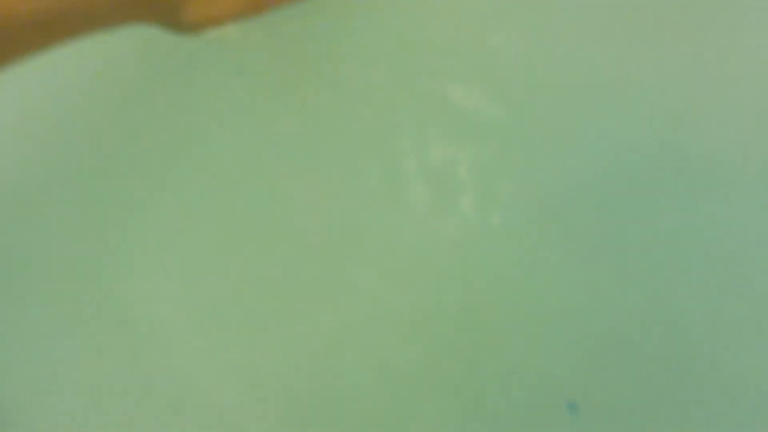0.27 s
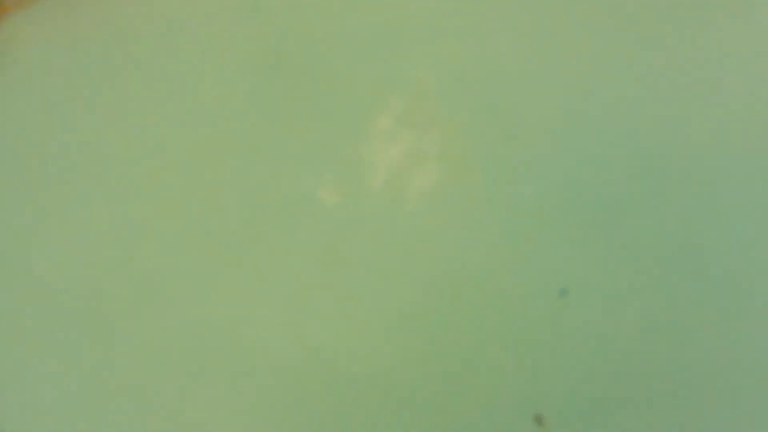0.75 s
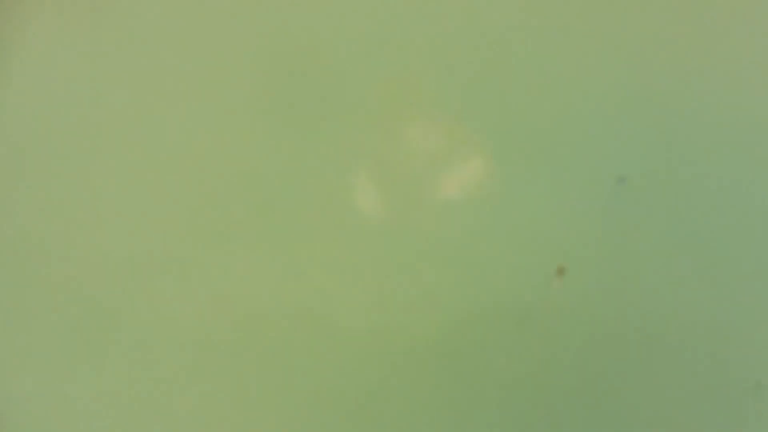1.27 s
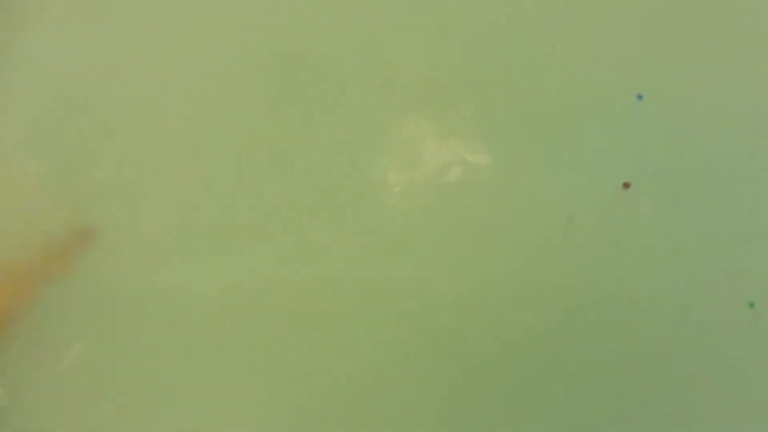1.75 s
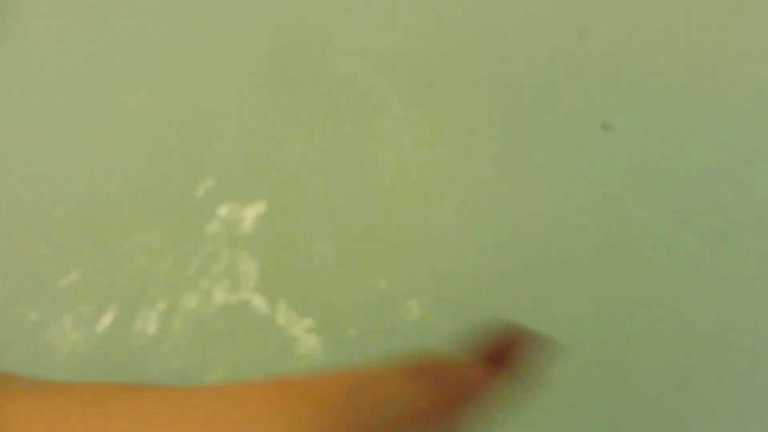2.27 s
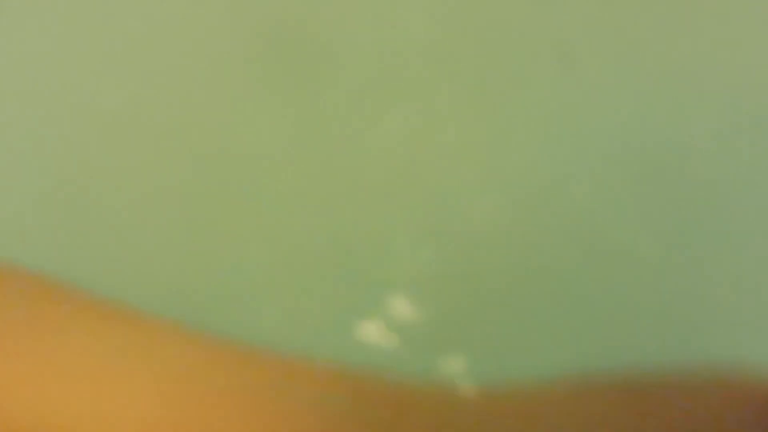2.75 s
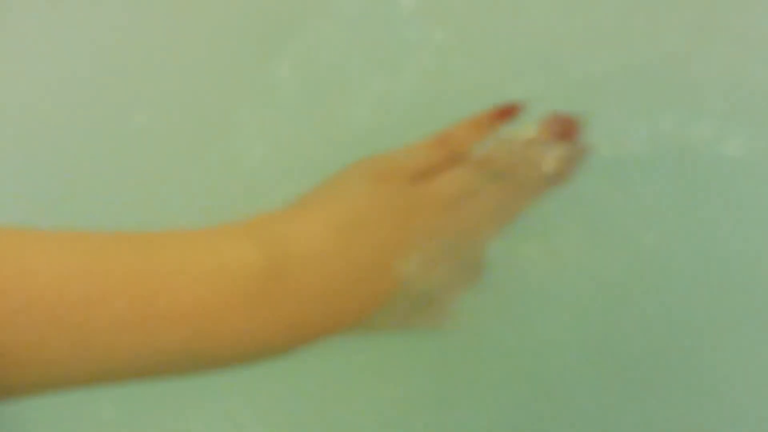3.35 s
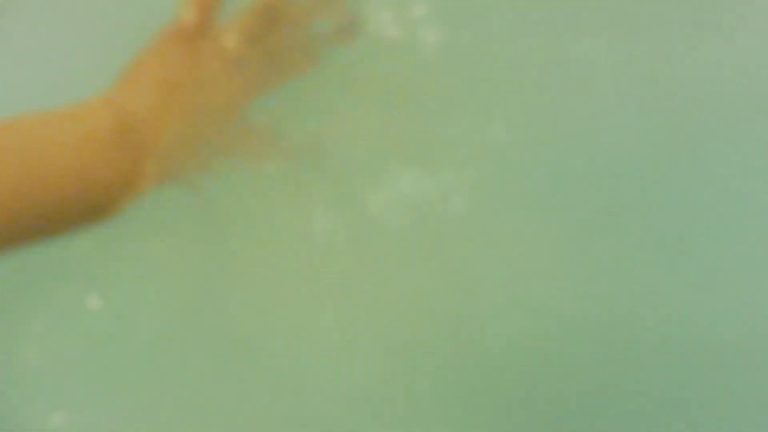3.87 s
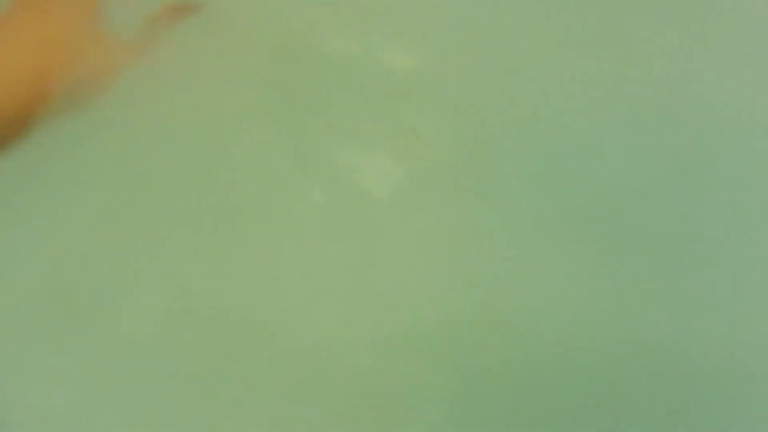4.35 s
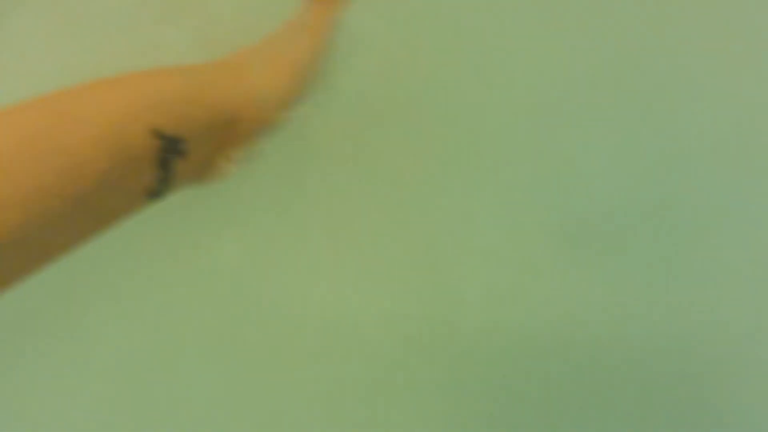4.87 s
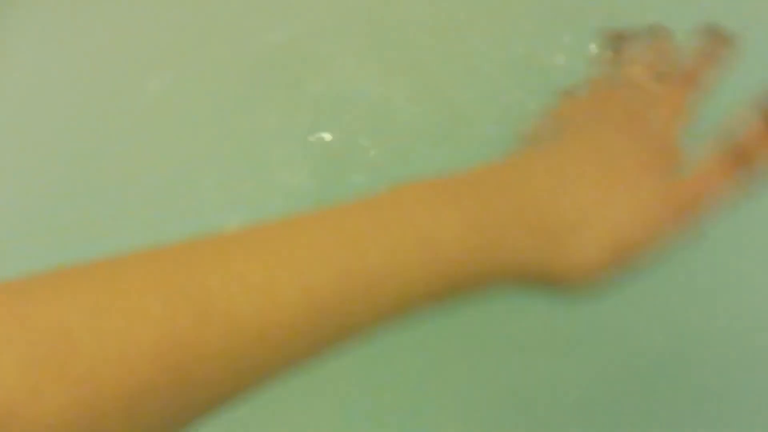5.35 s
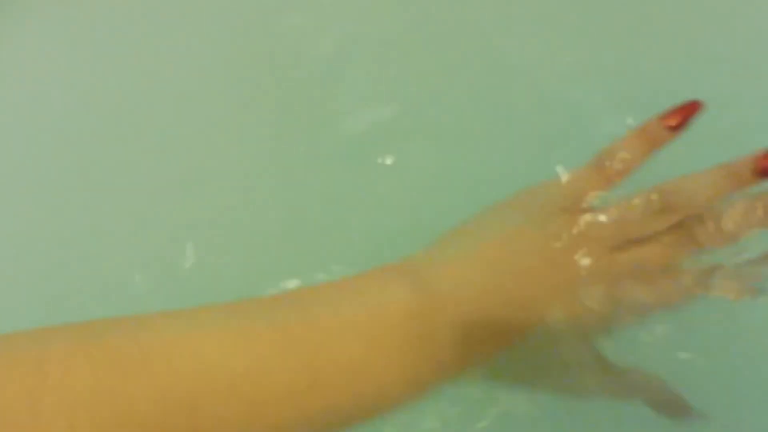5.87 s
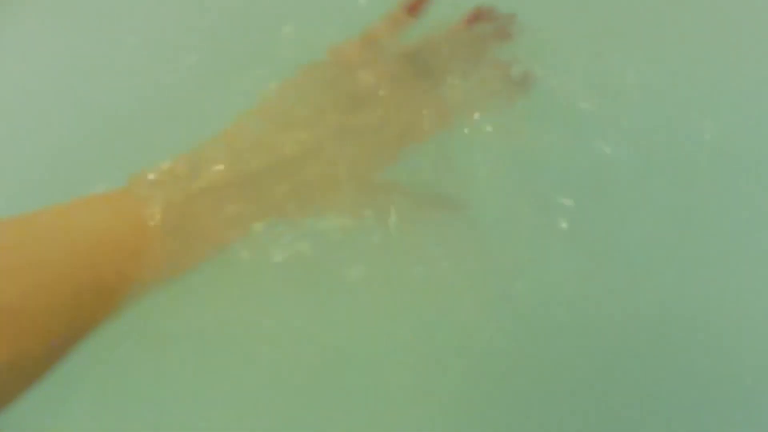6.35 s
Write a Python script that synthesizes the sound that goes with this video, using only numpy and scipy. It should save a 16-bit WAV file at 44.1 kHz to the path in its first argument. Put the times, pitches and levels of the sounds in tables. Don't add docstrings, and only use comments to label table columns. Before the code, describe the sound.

Constant airy hiss with a soft mid-pitched duct whistle fills a little tiled room. Close to a single microphone, bath water ticks with a short drip cluster, then churns in a half-second burst of gurgling bubbles and sharp droplets. Light drips follow near the middle, another small plop comes later, and a couple of faint drops end it. Tub and tiles add a short reverberation.

```python
import sys
import numpy as np
from scipy import signal
from scipy.fft import rfft, irfft, next_fast_len
from scipy.io import wavfile
from scipy.ndimage import uniform_filter1d, map_coordinates

SR = 44100
rng = np.random.default_rng(int(sys.argv[2]) if len(sys.argv) > 2 else 0)


def voltage_ratio(level):
    return 10 ** (np.asarray(level, float) / 20)


def log_audio(samples):
    frames = np.atleast_2d(samples).T
    limited = np.clip(frames, -1, 1)
    pcm = np.round(limited * 32767).astype(np.int16)
    wavfile.write(sys.argv[1], SR, pcm)


N = 291661


def rms_one(x):
    return x / np.sqrt(np.mean(x ** 2) + 1e-20)


def drift(rate_hz):
    pole = np.exp(-80 * np.pi * rate_hz / SR)
    noise = rng.standard_normal(N // 40 + 2002)
    slow = signal.lfilter([1], [1, -2 * pole, pole * pole], noise)[2000:]
    return np.interp(np.arange(N) / 40, np.arange(len(slow)), rms_one(slow))


def add_bubble(out, start_s, hz, db, t60, rise_octaves):
    start, t60 = int(start_s * SR), max(t60, 0.0004)
    length = min(int(t60 * SR) + 8, N - start)
    age = np.arange(length) / SR / t60
    pitch_hz = np.minimum(hz * 2 ** (rise_octaves * age), 0.45 * SR)
    cycles = np.cumsum(pitch_hz) / SR
    onset_cycles = max(1.2, 0.039 * t60 * hz)
    onset = 1 - np.exp(-cycles / onset_cycles)
    out[start:start + length] += voltage_ratio(db - 60 * age) * onset * np.sin(2 * np.pi * cycles)


# [t/s, f/Hz, level/dB]
HELD_BUBBLES = [(0.7799, 1900, -51.5), (1.4531, 1600, -38.5), (1.5297, 3330, -46.5), (1.5299, 3830, -49),
                (1.5343, 1527, -41.5), (1.54, 3770, -49), (1.5442, 3580, -44), (1.5956, 1838, -25),
                (1.6363, 2450, -41), (1.6635, 2320, -41), (1.6835, 2110, -40), (1.7176, 1800, -46),
                (1.7528, 2200, -50), (1.7611, 3130, -42), (1.7773, 2220, -43), (1.79, 557.6, -38),
                (1.853, 1320, -41), (1.8587, 2610, -39), (1.8776, 736, -36.5), (1.89, 1113, -37),
                (1.9, 1300, -37), (1.9059, 3500, -34), (1.913, 1880, -48), (1.9256, 599, -42),
                (2.8762, 2330, -49.5), (2.922, 3060, -55), (2.9521, 1954, -44), (6.2146, 1800, -48),
                (3.0133, 3230, -51), (4.85, 1400, -45), (4.866, 1466, -51)]
# [t/s, f/Hz, level/dB]
PLOPS = [(1.4625, 1620, -45), (1.5392, 3300, -44), (1.551, 1900, -54), (1.5956, 2560, -35.5),
         (1.603, 3000, -34), (1.615, 2060, -41), (1.622, 3120, -41), (1.7114, 493, -50),
         (1.7156, 2480, -35), (1.7656, 550, -35.5), (1.768, 3085, -34.5), (1.7783, 1410, -32),
         (1.7804, 738, -37), (1.7882, 2920, -42), (1.8202, 3310, -31.5), (1.8339, 2360, -34),
         (1.8497, 2220, -28.5), (1.865, 1580, -39), (1.8933, 2500, -41), (1.9094, 4360, -29.5),
         (1.9125, 1207, -35), (1.9253, 1780, -36), (1.9309, 3800, -39), (2.0241, 1890, -42),
         (2.0682, 3100, -49), (2.1416, 7300, -36.5), (2.799, 3760, -43.5), (2.8242, 2830, -48),
         (2.829, 4160, -39), (2.8425, 4700, -41)]
# [t/s, f/Hz, level/dB]
DRIPS = [(0.072, 7600, -42), (0.367, 4650, -44), (0.3676, 2690, -43), (0.3765, 950, -40.5),
         (0.391, 1950, -42), (0.7663, 2220, -50), (0.9885, 4540, -46.5), (1.1459, 6660, -45),
         (2.9095, 4450, -46), (2.975, 1500, -46), (2.97, 2630, -46), (2.9847, 1600, -47),
         (3.048, 2600, -52), (3.0805, 2530, -41), (3.081, 3520, -42), (3.126, 4430, -41.5),
         (3.153, 6300, -50), (3.199, 6500, -50), (4.861, 3330, -41), (4.8095, 4340, -45.5),
         (4.872, 1510, -48), (4.878, 1850, -44.5), (4.905, 1390, -50), (4.963, 2800, -54),
         (0.353, 2880, -44), (0.38, 2530, -46), (0.396, 2600, -50), (0.457, 3470, -53), (5.975, 3200, -58),
         (6.133, 1000, -48.5), (4.9161, 2240, -44.5), (4.9348, 2830, -38), (4.948, 967, -38.5),
         (5.211, 2680, -46.5), (5.3305, 3510, -44), (5.6173, 2370, -46.5), (6.034, 2690, -45.5),
         (6.1442, 1450, -43.5), (6.2236, 1660, -44.5)]


def rising_bubbles(out):
    for rows, cycles, climb in (HELD_BUBBLES, 82, 0.16), (PLOPS, 52, 0.18), (DRIPS, 55, 0.22):
        chances = rng.uniform(0.18, 1.68, len(rows))
        for (s, hz, db), chance in zip(rows, chances):
            add_bubble(out, s, hz, db, cycles / hz, climb * chance)


# [t/s, f/Hz, level/dB, cycles to die]
TICKS = [(0.35, 3070, -26.5, 15), (1.466, 997, -47, 70.), (2.9695, 1480, -33, 16.),
         (3.1503, 6400, -33, 20.), (3.197, 6600, -35, 20.), (1.607, 9300, -48, 90.), (1.782, 590, -36, 45.),
         (1.58, 780, -44, 45.), (1.8495, 2250, -33, 40.), (5.2, 2050, -52, 40.), (5.635, 2450, -50, 50.),
         (5.612, 4450, -53, 70.), (1.49, 1080, -52, 60.), (1.487, 1550, -48, 50.), (1.63, 1850, -38, 70.),
         (1.71, 478, -46, 52), (1.775, 555, -40, 40.), (1.806, 1450, -42, 30.), (6.146, 1300, -42.5, 23),
         (6.156, 1136, -48.5, 35.), (4.6, 2070, -56, 40.), (4.58, 1300, -52.5, 34),
         (0.3662, 3630, -36, 28.), (0.4073, 2310, -39.5, 25), (0.427, 322, -40, 13),
         (0.7184, 2970, -46.5, 30.), (1.616, 3470, -38, 28.), (1.731, 2353, -36, 23),
         (1.7921, 1740, -23, 13), (1.907, 2780, -28, 27), (1.9114, 2004, -15, 22),
         (1.9126, 1700, -18, 18.4), (1.9148, 3170, -19, 6.5), (2.004, 1970, -36, 23),
         (2.1448, 2070, -42.5, 21), (5.601, 4500, -46, 43), (2.777, 1580, -45, 25), (2.913, 3120, -32, 24),
         (2.914, 1750, -35, 28), (2.9143, 6640, -20, 9.5), (2.9637, 4500, -41, 29.),
         (3.0803, 3150, -26, 14), (3.1013, 2940, -36, 26), (3.12, 1780, -31.5, 13),
         (4.852, 1750, -40.5, 50), (4.93, 4300, -36.5, 31.), (5.1894, 2420, -41.5, 24),
         (6.153, 3010, -48, 46), (5.9606, 3320, -25.5, 10.6), (6.001, 5640, -40, 17),
         (6.1405, 2290, -35.5, 7.5)]
# [t/s, f/Hz, level/dB, cycles to die]
BURBLES = [(0.363, 3060, -45.0, 80), (0.3673, 2550, -50.0, 80), (1.4666, 3060, -53.0, 80),
           (1.5537, 2240, -52.0, 52), (1.5566, 1560, -49.0, 29), (1.5581, 2970, -54.0, 80),
           (1.5588, 3440, -49, 80), (1.5769, 2630, -58, 73), (1.6052, 3470, -44, 88),
           (1.6154, 2050, -41, 57), (1.6168, 560, -50, 90), (1.6183, 2630, -49, 80),
           (1.6284, 3620, -52.0, 80), (1.6444, 3190, -47, 80), (1.6611, 468, -48, 55),
           (1.6865, 1700, -45, 53), (1.7112, 2220, -44, 55), (1.7453, 1025, -36.5, 72),
           (1.7533, 2220, -43, 74), (1.7664, 1540, -51, 42), (1.799, 2900, -46, 80),
           (1.8017, 2430, -40, 57), (1.8077, 2760, -52.0, 80), (1.8186, 1760, -39, 49),
           (1.8345, 3920, -52.0, 80), (1.851, 1580, -37, 37), (1.8585, 608, -47, 43),
           (1.8599, 2650, -47, 80), (1.8708, 3230, -53.0, 80), (1.8773, 777, -39, 74),
           (1.8868, 1630, -47, 80), (1.8947, 2440, -50, 68), (1.9419, 2580, -49, 80),
           (1.9434, 1780, -42, 80), (1.9455, 3900, -52.0, 80), (1.947, 1370, -48, 44),
           (1.9521, 637, -42.5, 25), (1.9992, 2670, -55.0, 80), (2.0225, 2610, -52.0, 80),
           (2.8127, 3920, -56.0, 80), (2.8305, 991, -42.5, 76), (2.9137, 1290, -49.0, 52),
           (3.123, 3180, -55.0, 80), (3.1747, 2100, -54, 80), (4.9283, 1590, -50, 72),
           (4.9873, 1115, -45, 60)]
# [t/s, f/Hz, level/dB]
STRAYS = [(0.326, 6750, -46), (0.4285, 3470, -45), (0.445, 2020, -49), (1.4667, 3670, -49),
          (1.6437, 2470, -38), (1.8007, 2420, -45), (1.803, 550, -36), (2.547, 2600, -48),
          (2.829, 2280, -50), (2.8577, 3250, -45), (2.9521, 3640, -42), (3.1295, 2500, -51),
          (3.256, 2760, -50), (3.744, 4400, -46.5), (3.9, 2040, -52), (4.6101, 3060, -51),
          (4.785, 3420, -46.5), (4.8514, 2590, -48), (4.9354, 6000, -42), (5.5561, 3870, -49.5)]
# [t/s, f/Hz, level/dB]
SPARKLES = [(0.3248, 10600, -54.0), (0.3734, 5860, -50.0), (0.3923, 11890, -53), (1.1447, 11100, -61),
            (1.5692, 4220, -46), (1.5946, 9300, -48), (1.62, 5130, -43.0), (1.6208, 5940, -43),
            (1.7383, 10600, -46), (1.7398, 9700, -51), (1.7456, 11280, -53), (1.7499, 9900, -51),
            (1.7521, 5560, -52.0), (1.7673, 9440, -44), (1.7673, 10200, -44), (1.7876, 5300, -52),
            (1.7898, 9730, -53.0), (1.7971, 8700, -48), (1.7971, 10080, -49.0), (1.8341, 8650, -50),
            (1.8435, 5650, -47), (1.8435, 6290, -49.0), (1.895, 4740, -51), (1.9066, 6160, -41.5),
            (1.9096, 10850, -54), (1.9103, 9220, -43), (1.9175, 4530, -48), (1.9175, 9220, -53),
            (2.8267, 11300, -48), (2.8267, 11710, -53.0), (2.8275, 5080, -45.0), (2.9124, 9560, -48),
            (2.9697, 8440, -53.0), (3.0778, 8960, -55.0), (3.1496, 7150, -50.0), (3.1968, 6500, -46.0),
            (4.9325, 5340, -47), (6.0006, 5170, -51)]


def ticks_and_droplets(out, rise_octaves=0.065):
    for rows in TICKS, BURBLES:
        for s, hz, db, cycles in rows:
            add_bubble(out, s, hz, db, cycles / hz, rise_octaves)
    for rows, cycles in (STRAYS, 38), (SPARKLES, 115):
        for s, hz, db in rows:
            add_bubble(out, s, hz, db, cycles / hz, rise_octaves)


# [t/s, f/Hz, level/dB, t60/s, rise/octaves per t60]
POCKETS = [(1.58, 761, -49.5, 0.29, 0.069), (1.628, 406, -44, 0.17, 0.44), (1.665, 451, -45, 0.15, 0.57),
           (1.745, 1056, -40.5, 0.16, 0.071), (1.826, 520, -49, 0.067, 0.26), (1.86, 560, -58, 0.047, 0.76),
           (1.955, 636, -49, 0.074, .1), (1.975, 1014, -40.5, 0.051, 0.11), (2.01, 860, -44.5, 0.053, 0.18),
           (2.045, 1047, -53, 0.078, 0.09), (1.9112, 2040, -28, 0.011, 0.1),
           (2.772, 1024, -43, 0.067, 0.043), (2.828, 890, -51, 0.044, 0.14),
           (2.841, 1042, -49, 0.065, 0.051), (4.815, 796, -44.5, 0.083, 0.66),
           (4.834, 986, -47, 0.055, 0.18), (4.928, 1079, -30, 0.04, 0.041), (4.947, 1038, -39, 0.046, .05),
           (4.96, 1118, -42, 0.059, 0.055), (6.141, 1130, -36, 0.012, .25)]


def air_pockets(out):
    for s, hz, db, t60, rise_octaves in POCKETS:
        add_bubble(out, s, hz, db, t60, rise_octaves)


def bubbles(lift_db=3.0, flutter_db=2.6, wobble_s=0.00004):
    out = np.zeros(N)
    rising_bubbles(out)
    ticks_and_droplets(out)
    air_pockets(out)
    path = np.arange(N) + wobble_s * SR * drift(90)
    return voltage_ratio(lift_db + flutter_db * drift(95)) * map_coordinates(out, [path], order=3)


def swell(peak_s, db, rise_t60, fall_t60):
    age = np.arange(0, N + 16, 16) / SR - peak_s
    return voltage_ratio(db - 60 * np.where(age < 0, -age / rise_t60, age / fall_t60))


def grains(per_s, low_hz, high_hz, cycles, spread_db, tilt_db):
    sizes = voltage_ratio(spread_db * np.minimum(rng.exponential(1, N), 4)) * rng.choice([-1, 1], N)
    clicks = sizes * (rng.random(N) < per_s / SR)
    dealt, out = rng.integers(0, 16, N), np.zeros(N)
    for k, hz in enumerate(np.geomspace(low_hz, high_hz, 16)):
        pole, angle = voltage_ratio(-60 * hz / (cycles * SR)), 2 * np.pi * hz / SR
        mine = clicks * (dealt == k) + 1e-18
        ring = signal.lfilter([0, np.sin(angle)], [1, -2 * pole * np.cos(angle), pole * pole], mine)
        out += voltage_ratio(tilt_db * np.log2(hz / low_hz)) * ring
    return rms_one(out)


# [t/s of the peak, level/dB, depth/dB towards large bubbles, settling t60/s]
STIRS = [(.362, -50.5, -7, 0.39), (.43, -50, -2, 0.14), (.78, -58, -7, 0.27), (1.46, -47, -8, .3),
         (1.54, -46, 1.5, 0.37), (1.63, -45, -1, 0.63), (1.751, -41, 8, 0.47), (1.79, -51, 8, .3),
         (1.87, -46.5, 8, 0.48), (1.924, -41.5, 3, 0.33), (2.02, -48.5, -5, .25), (2.15, -61, -30, 0.94),
         (2.83, -53, -8, 0.86), (2.93, -55, -17, 0.76), (3.09, -60, 4, .4), (3.2, -65, -11, 0.66),
         (4.58, -60, 0, 0.87), (4.76, -56, -17, 0.61), (4.82, -61, 7, 0.18), (4.93, -52.5, -7, 0.54),
         (5.97, -70, -9, .8), (6.15, -57, 2, 0.19), (6.22, -63, -14, .5)]


def churn(gurgle_trim_db=-12.0, swarm_trim_db=-9.5, plink_db=-10, spray_trim_db=1.0):
    pushes = np.array([swell(s, db, 0.17, t60) ** 2 for s, db, _, t60 in STIRS])
    depth_db = np.array(STIRS)[:, 2]
    swarm_gain = np.sqrt(pushes.sum(axis=0))
    gurgle_gain = np.sqrt(voltage_ratio(2 * depth_db) @ pushes)
    mist = sum(swell(s, db - 27, 0.11, 0.26) ** 2 for s, db, _ in SPLATS)
    spray_db = -15 - 0.22 * depth_db
    spray_gain = np.sqrt(voltage_ratio(2 * spray_db) @ pushes + mist)

    def every_sample(gain):
        return np.interp(np.arange(N) / 16, np.arange(len(gain)), gain)

    gurgle = grains(450, low_hz=520, high_hz=1350, cycles=24, spread_db=2, tilt_db=3)
    swarm = grains(1400, low_hz=1370, high_hz=4300, cycles=6.6, spread_db=-1.5, tilt_db=-0.5)
    spray = grains(4000, low_hz=4000, high_hz=12100, cycles=17.0, spread_db=3.5, tilt_db=1.0)
    spray = voltage_ratio(3.4 * drift(45)) * spray
    plinks = grains(320, low_hz=1700, high_hz=4200, cycles=11.0, spread_db=3.0, tilt_db=-7.0)
    swarm = voltage_ratio(swarm_trim_db) * swarm + voltage_ratio(plink_db) * plinks
    out = voltage_ratio(gurgle_trim_db) * every_sample(gurgle_gain) * gurgle
    out += every_sample(swarm_gain) * swarm
    return out + voltage_ratio(spray_trim_db) * every_sample(spray_gain) * spray


# [t/s, level/dB, centre f/Hz]
SPLATS = [(0.3258, -39.5, 7200), (0.3505, -32, 3730), (.374, -39, 6600), (.7394, -47, 8000),
          (1.1448, -45, 8500), (1.458, -42, 6000), (1.597, -30, 3000), (1.621, -42, 7000),
          (1.631, -35.5, 5500), (1.7687, -34, 10100), (1.797, -35, 9500), (1.845, -40, 7500),
          (1.9064, -27, 3740), (1.912, -43, 7900), (1.997, -40, 8500), (2.141, -44, 7500),
          (2.153, -43, 10500), (2.777, -38, 2600), (2.8266, -37, 5000), (2.865, -44, 10500),
          (2.9133, -30, 7000), (2.9697, -41, 4000), (3.073, -42, 10000), (3.0798, -30, 4800),
          (3.1505, -42, 6340), (3.197, -46, 7500), (4.929, -37, 4200), (5.9615, -35, 3400),
          (5.999, -47, 6500), (6.143, -39, 2600)]


def splats(span=1.41, t60=0.0067):
    out, noise = np.zeros(N), rng.standard_normal((len(SPLATS), 2048))
    for (s, db, hz), row in zip(SPLATS, noise):
        burst = row * voltage_ratio(db + 1.5 - 60 * np.arange(len(row)) / SR / t60)
        edges_hz = [hz / span, min(hz * span, 0.45 * SR)]
        band = signal.butter(2, edges_hz, "band", fs=SR, output="sos")
        start = int(s * SR)
        out[start:start + len(row)] += signal.sosfilt(band, burst)
    return out


# [delay t/s, level/dB]
TUB_ECHOES = [
    (.0032, -17.5),
    (0.016, -19),
    (0.034, -29),
]


def bathroom(x, t60=0.33, delay_s=0.0036, tail_db=-5.0, wall_cut_hz=2600):
    age = np.arange(SR // 2) / SR
    noise = rng.standard_normal(len(age)) * (age > delay_s)
    dull = signal.lfilter(*signal.butter(1, wall_cut_hz, fs=SR), noise)
    bright = noise - dull
    tail = dull * voltage_ratio(-60 * age / t60) + bright * voltage_ratio(-120 * age / t60)
    answer = voltage_ratio(tail_db) * tail / np.sqrt(np.sum(tail ** 2))
    answer[0] = 1
    for lag_s, db in TUB_ECHOES:
        answer[int(lag_s * SR)] += voltage_ratio(db)
    return signal.fftconvolve(x, answer)[:N]


def resonate(x, hz, width_hz):
    pole = np.exp(-np.pi * width_hz / SR)
    feedback = [1, -2 * pole * np.cos(2 * np.pi * hz / SR), pole * pole]
    return signal.lfilter(np.array([1, 0, -1]) * (1 - pole * pole) / 2, feedback, x)


# [f/Hz, width/Hz, level/dB]
WHISTLES = [
    (1024, 135, -0.5),
    (1106, 26, -7.5),
    (1750, 10, -39),
]


def duct_whine(whine_db):
    white = rng.standard_normal((len(WHISTLES), N))
    whine = np.zeros(N)
    for noise, (hz, width_hz, db) in zip(white, WHISTLES):
        twice = resonate(resonate(noise, hz, width_hz), hz, width_hz)
        whine += voltage_ratio(db) * rms_one(twice)
    return voltage_ratio(whine_db - 2.5 + 1.25 * drift(2.6)) * rms_one(whine)


def mains_hum(hz=101.2, db=-73.5):
    phase = 2 * np.pi * hz * np.arange(N) / SR + 0.8 * drift(5)
    return np.sqrt(2) * voltage_ratio(db + 2.2 * drift(6)) * np.sin(phase)


def coloured(gain):
    size = next_fast_len(N)
    fine = np.interp(np.linspace(0, 1, size // 2 + 1), np.linspace(0, 1, len(gain)), gain)
    return rms_one(irfft(rfft(rng.standard_normal(size)) * fine, size)[:N])


# [t/s, level/dB]
DRAUGHT = [(0, -61.5), (.9, -65), (1.6, -61.5), (2.1, -63), (2.6, -59.5), (2.95, -62.5), (3.2, -58.5),
           (3.5, -58), (4.2, -60), (4.7, -62.5), (5.4, -65.5), (6.61, -64)]
# [f/Hz, level/dB per Hz]
AIR = [(25, -16), (70, -14), (130, -12), (300, -9.5), (900, -10), (1200, -17.5), (1700, -15), (3800, -22),
       (6300, -23), (11500, -23)]
# [f/Hz, width/Hz, level/dB]
HISS_PEAKS = [
    (5000, 950, 11),
    (7600, 1430, 10),
]


def room_tone(split_hz=2500, vent_db=-61.0, vent_trim_db=2.0, hiss_db=-60.0):
    t = np.arange(N) / SR
    whine_db = np.interp(t, *np.transpose(DRAUGHT))
    broad_db = vent_db + 0.13 * (whine_db - whine_db.mean()) - 0.2727 * t
    hz = np.linspace(1, SR / 2, 8192)
    air_hz, air_db = np.transpose(AIR)
    colour = voltage_ratio(np.interp(np.log(hz), np.log(air_hz), air_db))
    for peak_hz, width_hz, db in HISS_PEAKS:
        colour = colour * voltage_ratio(db / (1 + (2 * (hz - peak_hz) / width_hz) ** 2))
    low_share = 1 / (1 + (hz / split_hz) ** 4)
    vent = voltage_ratio(broad_db + vent_trim_db + 1.0 * drift(2.2)) * coloured(colour * np.sqrt(low_share))
    hiss = voltage_ratio(hiss_db + 0.55 * drift(2.4)) * coloured(colour * np.sqrt(1 - low_share))
    return vent + hiss + duct_whine(whine_db) + mains_hum()


def scene():
    water = bubbles() + splats() + churn()
    water = signal.sosfilt(signal.butter(2, 230, "high", fs=SR, output="sos"), water)
    mono = bathroom(water) + room_tone()
    return np.array([mono, mono])


def band_limit(x):
    return signal.sosfilt(signal.butter(12, 13130, fs=SR, output="sos"), x)


# [from t/s, to t/s]
TOP_OPEN = [
    (0, 1.2),
    (1.22, 1.37),
    (1.41, 2.33),
    (2.41, 2.45),
    (3.11, 3.24),
]


def record(dry, top_low_hz=12030, top_high_hz=12830):
    size = next_fast_len(N)
    hz, whole = np.arange(size // 2 + 1) * SR / size, rfft(dry, size)
    body = irfft(whole * (hz < top_low_hz), size)[:, :N]
    top = irfft(whole * (hz >= top_low_hz) * (hz < top_high_hz), size)[:, :N]
    t = np.arange(N) / SR
    is_open = sum(1.0 * (t >= a) * (t < b) for a, b in TOP_OPEN)
    gate = uniform_filter1d(is_open, size=400)
    return band_limit(body + gate * top)


dry = scene()
out = record(dry)
log_audio(out)
```